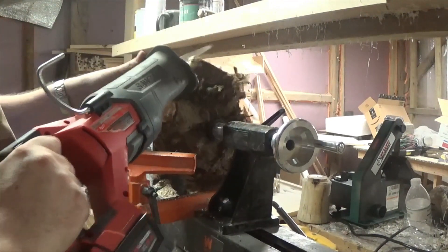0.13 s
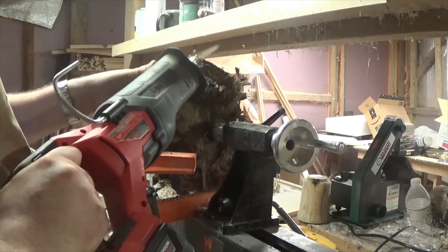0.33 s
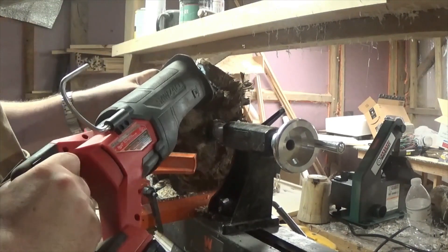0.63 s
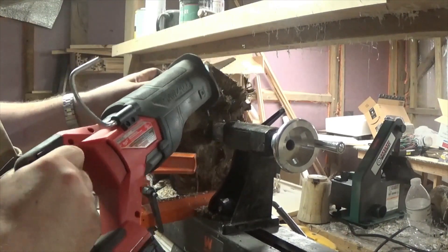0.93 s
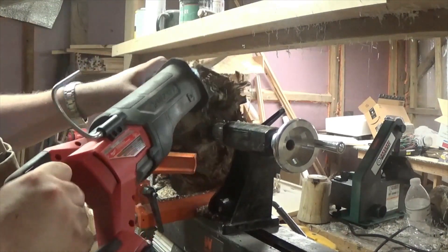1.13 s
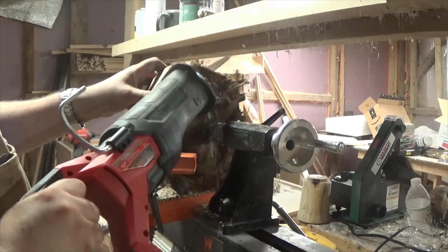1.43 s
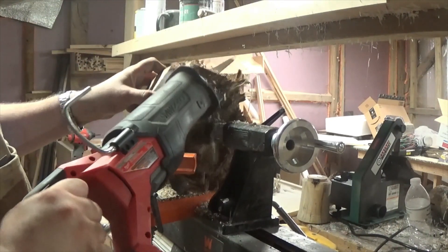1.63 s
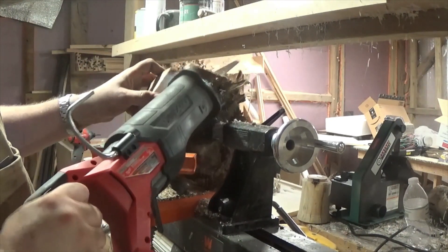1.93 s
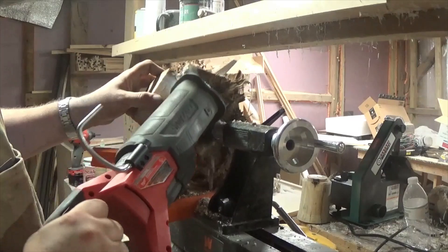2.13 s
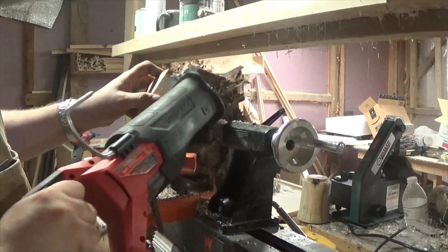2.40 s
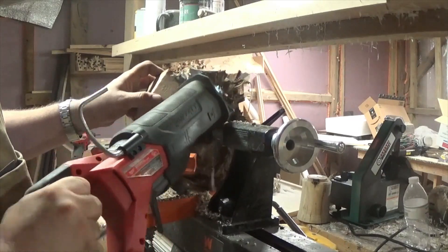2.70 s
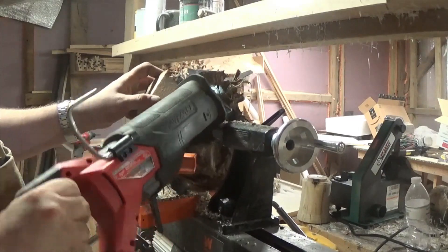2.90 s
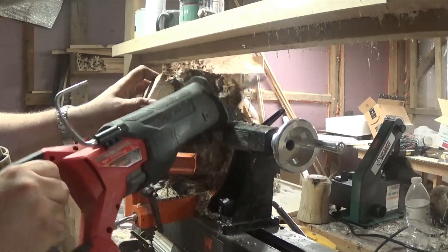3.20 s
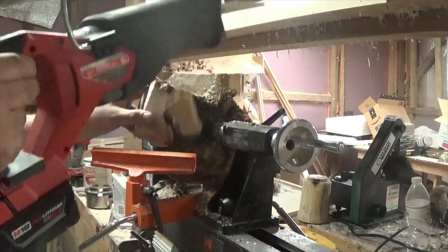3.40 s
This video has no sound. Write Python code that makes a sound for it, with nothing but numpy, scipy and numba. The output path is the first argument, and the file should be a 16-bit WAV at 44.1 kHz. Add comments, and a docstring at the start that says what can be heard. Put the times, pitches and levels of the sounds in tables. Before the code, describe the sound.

Close, bright reciprocating saw in a small shed, starting and stopping abruptly; dense hissing rasp over motor hum and gear whine, with brief squeals and groans, faint rings in the gaps, ending in tool clatter.

```python
"""A small saw cuts wet wood in short bursts, close to a camera in a shed.
Each burst starts sharply: dense random strikes excite blade and wood over drive hum and gear whine.
Squeals, groans, rasps and high whines, narrow noise bands, sound as it cuts; a small room's tail follows.
Between bursts come faint narrow-band rings and scrapes; one dull knock falls within the long burst.
At the end the tool scrapes, ticks and knocks as damped modes and noise; a faint hush lies beneath."""
import sys
import numpy as np
from scipy import signal
from scipy.fft import rfft, irfft
from scipy.io import wavfile
from scipy.ndimage import uniform_filter1d
from numba import njit

SR = 44100
rng = np.random.default_rng(int(sys.argv[2]) if len(sys.argv) > 2 else 0)


def generate_wav(signal):
    """Clip the signal to [-1, 1] and save it as 16-bit WAV at the path in sys.argv[1]."""
    frames = np.transpose(np.atleast_2d(signal))
    scaled = np.clip(frames, -1, 1) * 32767
    pcm = np.round(scaled).astype(np.int16)
    wavfile.write(sys.argv[1], SR, pcm)


N = 156555
T = np.arange(N) / SR  # s
FREQ = np.fft.rfftfreq(N, 1 / SR) + 1  # Hz, offset by 1 so that its logarithm exists

# Cutting bursts: start t/s, stop t/s, attack t/s
BURSTS = [(0.014, 0.587, 0.0012), (0.845, 0.963, 0.0063), (1.104, 2.646, 0.0089), (2.69, 2.758, 0.0067),
          (2.762, 2.839, .003), (2.984, 3.267, 0.0031)]
# Decay time of each band after a burst: T60/s
RELEASE_T60_S = [.1, .12, .11, .075, .06, .055]
# Band levels while cutting, one run of rows through all the bursts, in order of time: t/s, then
# level/dB of rumble, low wood, high wood, low treble, middle treble, top treble
BAND_LEVELS = [
    [(0.03, -65, -57, -62, -35.5, -34.5, -21), (0.06, -77, -44, -58, -36.5, -34, -31),
     (0.096, -60.5, -39, -45, -35, -34, -30), (0.144, -54, -57, -49.5, -34, -38, -29),
     (0.284, -81, -48, -44, -35.5, -30.5, -26), (0.312, -73, -46.5, -40.5, -33.5, -33, -29),
     (0.58, -60, -47.5, -50, -34, -34, -28.5)],
    [(0.86, -76, -50.5, -52.5, -36, -29.5, -34.5), (0.904, -57, -43, -54, -33.5, -40, -27),
     (0.932, -63, -50, -45, -32, -32, -22.5), (0.95, -54, -35, -33.5, -35, -46, -34)],
    [(1.125, -62, -48, -49, -36, -32.5, -23.5), (1.153, -67, -44, -50, -33, -33, -30),
     (1.185, -84, -53.5, -65, -33.5, -30, -32), (1.337, -58, -50, -52, -32.5, -36.5, -27),
     (1.355, -53, -42.5, -58, -34, -31, -29), (1.437, -74, -47.5, -45, -33.5, -31.5, -30),
     (1.9, -67.5, -49.5, -43, -34, -32, -31)],
    [(1.92, -76, -47, -43, -33.5, -33.5, -28.5), (2.118, -73, -54.5, -54, -32, -35, -28),
     (2.154, -97, -49, -54, -33.5, -32, -28.5), (2.288, -63, -52.5, -49, -33.5, -34.5, -28),
     (2.324, -94, -47, -54, -33, -35, -29), (2.342, -72, -54.5, -49, -32, -32, -29.5),
     (2.64, -61, -45, -40.5, -33.5, -33, -29.5)],
    [(2.705, -71, -61, -53, -39.5, -28, -30), (2.731, -65, -51, -36, -36.5, -30, -30),
     (2.749, -56, -38.5, -41.5, -30.5, -41, -23), (2.761, -71, -40, -39, -37, -45, -38),
     (2.775, -78, -56, -51, -35.5, -27, -32), (2.823, -57, -49, -58, -32, -37, -22),
     (2.835, -60, -39.5, -41.5, -36, -49, -31)],
    [(3.0, -82, -75, -77, -36, -32, -25.5), (3.026, -56, -45, -46, -31.5, -34, -26.5),
     (3.134, -69, -58, -50, -34.5, -30.5, -31), (3.19, -65, -71, -45.5, -30, -35, -27),
     (3.214, -70, -71, -87, -33.5, -30.5, -31), (3.238, -85, -73, -67, -33, -32, -31),
     (3.265, -60, -45.5, -59, -33.5, -35, -26.5)],
]
# Borders between those six bands: f/Hz
BAND_EDGES_HZ = [150, 900, 1700, 5000, 9500]
# Random level spread of each band: level/dB
CHATTER_DB = [3, 2.5, 2.8, 1.7, 1.1, 1.1]
CHATTER_PER_S = 90
# Relative spectrum of the strike noise: f/Hz, level/dB per Hz
HISS_SPECTRUM = [(24, -104), (40, -43), (296, -18.5), (500, -7.5), (539, -7), (643, -10.5), (1200, -13),
                 (1620, -10), (3800, -5.5), (6750, 1), (15800, 12)]
# Resonances of the wood: f/Hz, width/Hz, relative level/dB
WOOD_MODES = [(891, 43, 2), (1217, 53, 14), (1370, 60, 5.5), (1960, 27, 2)]
# Resonances of the blade: f/Hz, width/Hz, relative level/dB
BLADE_MODES = [(6810, 760, 4), (8060, 100, 8), (8660, 490, 7.5), (9180, 130, -2), (10550, 67, 11.5),
               (13940, 1450, 11), (15640, 670, 13.5)]
STRIKE_SCATTER_DB, WOOD_BLADE_SPLIT_HZ = 0.84, 2800
WOOD_DB, BLADE_DB = -12.5, -13  # resonances relative to the hiss on their side of the split
MODE_WANDER_DB, MODE_DRIFT = 2, .01  # drift as a fraction of the frequency

# Blade squeals, wood groans and rasps, and high drive whines near 14 kHz:
# start t/s, length t/s, from f/Hz, to f/Hz, width/Hz, level/dB
SQUEALS = [(0.01, 0.28, 10830, 10500, 250, -33), (0.035, 0.037, 9340, 8100, 250, -31),
           (.195, 0.037, 7080, 8300, 250, -32), (0.866, 0.041, 9720, 11530, 250, -27),
           (0.029, 0.037, 650, 604, 150, -42.5), (0.031, .04, 850, 825, 80, -44),
           (0.07, 0.042, 834, 790, 60, -36), (0.085, .035, 1070, 1040, 50, -39),
           (0.102, 0.044, 720, 580, 60, -43), (0.178, 0.036, 573, 570, 80, -39),
           (1.7, .26, 1233, 1225, 50, -41), (2.547, 0.066, 1190, 1174, 50, -40.5),
           (3.144, 0.057, 1200, 1195, 60, -43.5), (.25, 0.29, 14200, 14200, 100.7, -40),
           (0.257, 0.35, 8900, 8800, 250, -37.5), (3.05, 0.054, 13900, 14200, 40, -38),
           (3.09, .095, 14200, 13900, 40, -40), (3.175, 0.061, 14080, 14650, 40, -43),
           (3.09, 0.1, 15250, 15100, 50, -37)]
# Faint rings between and after bursts: start t/s, length t/s, f/Hz, level/dB, T60/s
RINGS = [(.605, .2, 5206, -68, .6), (.98, .125, 5230, -66, 3), (2.86, .09, 5200, -67, 3),
         (2.875, .055, 780, -56, 3), (3.3, .12, 5200, -72, 3)]
FLUTTER_DB, RING_WIDTH_HZ = 2.5, 30

# Blade speed and load: t/s, rate/strokes per s, bite/0-1
SPEED = [(0, 62.2, .3), (.22, 62.2, .4), (.27, 62.2, 1), (.59, 62.2, .9), (.85, 62.2, .5), (.96, 62.2, .5),
         (1.15, 61.7, 0), (1.4, 60.3, 0), (1.7, 59.4, 0), (2.0, 60, 0), (2.15, 60.8, 0), (2.4, 61.4, 0),
         (2.64, 62.5, 0), (2.7, 63, .5), (2.84, 63.5, .2), (3.0, 64, .2), (3.18, 64.4, .1),
         (3.26, 66.4, .1)]
# Drive hum: multiple of the stroke rate, level/dB running light, level/dB biting (before wander)
DRIVE_HARMONICS = [(3, -68, -72), (4, -71, -73), (5, -61, -67), (6, -59, -65), (8, -64, -60), (9, -50, -62),
                   (11, -62, -47), (12, -60, -62), (13, -63, -48), (14, -65, -50), (17, -65, -48),
                   (18, -59, -65), (19, -65, -51), (20, -57, -65), (24, -60, -60), (25, -65, -52),
                   (30, -60, -65)]
DRIVE_WANDER_DB, SPEED_WAVER = 4.5, .002  # waver as a fraction of the rate
GEAR_MULTIPLE, GEAR_DB, GEAR_BITE_DB, GEAR_JITTER = 67.3, -44.5, -8, .0055

# Scrapes: start t/s, length t/s, level/dB of the bright noise, body level/dB relative to it
SCRAPES = [(0.99, 0.12, -64, 0), (2.9, 0.11, -59, -5.5), (2.954, 0.053, -45.5, -9), (3.33, 0.034, -64, 5),
           (3.36, 0.095, -65, -4)]
# Ticks: t/s, nominal peak level/dB
TICKS = [(2.916, -55), (2.936, -49), (3.407, -50), (3.417, -28.5), (3.435, -46)]
# Knocks: t/s, peak level/dB of the modes, dullness/0-1, centre f/Hz
KNOCKS = [(1.335, -37, .95, 240), (3.4662, -21, .12, 1300), (3.543, -45, 1.0, 680)]
# Modes of the tool: f/Hz, relative level/dB, T60/s
TOOL_MODES = [(190, -24, .1), (320, -22, .08), (592, -8, .06), (720, -14, .05), (883, -10, .06),
              (1034, -12, .06), (1250, 0, .04), (1389, -2, .06), (1453, -3, .065), (1707, -10, .06),
              (1950, -9, .05), (2396, -15, .06), (2900, -15, .05), (3600, -13, .05), (4500, -14, .035)]
TICK_T60_S, BRIGHT_CORNER_HZ, SCRAPE_FLUTTER_DB = 0.0081, 2560, 3
KNOCK_RISE_S, KNOCK_ROUGH_DB, DULL_DB_PER_OCTAVE = .003, 3.5, 24
CRACK_DB, CRACK_DULL_DB, CRACK_T60_S = -9, -30, 0.065

# Reverberation of the room: band centre f/Hz, T60/s
ROOM_DECAY = [(300, 0.16), (1300, 0.2), (4000, 0.1), (12000, 0.05)]
ROOM_DB = -14
# Relative spectrum of the hush: f/Hz, level/dB per Hz
HUSH_SPECTRUM = [(18, -47), (30, -17), (316, -1), (534, -11), (1050, -11), (1270, -8), (2080, -13),
                 (13700, -16), (15600, -18)]
HUSH_DB, HUSH_SIDE_DB = -72, -9
BUZZ_HZ, BUZZ_DB, MAINS_PULSES_HZ = 13960, -85, 120
# Stereo width: f/Hz, side level/dB relative to mid
SIDE_SPECTRUM = [(60, -17), (125, -26), (400, -25), (800, -19), (1500, -11.5), (4000, -10.5), (8000, -10),
                 (14000, -13.5)]
LEFT_OVER_RIGHT_DB = .4
CEILING, TOP_HZ = 0.6, 15720  # soft limit of amplitude, edge of the low-pass


def undb(db):
    """Amplitude ratio is ten to the power dB/20."""
    return 10 ** (np.asarray(db) / 20)


def unit(x):
    """Normalisation to a root mean square of one."""
    return x / np.sqrt(np.mean(x ** 2))


def on_hz(table):
    """Interpolation of (f/Hz, value) rows along a logarithmic frequency axis."""
    table = np.array(table)
    return np.interp(np.log(FREQ), np.log(table[:, 0]), table[:, 1])


def shape(x, gain):
    """Linear filtering as multiplication of the spectrum."""
    return irfft(rfft(x) * gain, N)


@njit
def svf(x, hz, width):
    """State-variable resonator: a band-pass of unit peak gain whose centre may move."""
    y, band, low = np.empty(len(x)), 0., 0.
    for i in range(len(x)):
        g = np.tan(np.pi * hz[i] / SR)
        damping = width / hz[i]
        v = (band + g * (x[i] - low)) / (1 + g * (g + damping))
        band, low = 2 * v - band, low + 2 * g * v
        y[i] = damping * v
    return y


def band_noise(hz, width):
    """White noise through a resonator of fixed centre, at unit level."""
    return unit(svf(rng.standard_normal(N), np.full(N, 1. * hz), 1. * width))


def walk(rate):
    """Slow random modulation: smoothed random steps at the given rate in Hz, spread one."""
    k = int(SR / rate)
    steps = np.repeat(rng.standard_normal(N // k + 1), k)
    smooth = uniform_filter1d(uniform_filter1d(steps, k), k)
    return unit(smooth[:N])


def fade(start, t60):
    """Exponential decay, 60 dB in the time t60."""
    return (T >= start) * undb(-60 * np.maximum(T - start, 0) / t60)


def swell(start, length):
    """Trapezoidal envelope: a linear rise, a hold and a linear fall."""
    u = (T - start) / length
    return np.clip(np.minimum(u, 1 - u) * 6, 0, 1)


def gate(t60):
    """Burst envelope: quadratic attack, hold and exponential release as the trigger goes on and off."""
    envelopes = []
    for start, stop, attack in BURSTS:
        rise = np.clip((T - start) / attack, 0, 1) ** 2
        envelopes.append(rise * undb(-60 * np.maximum(T - stop, 0) / t60))
    return np.max(envelopes, axis=0)


def resonances(x, table):
    """Forced modes in parallel, each drifting in frequency and level independently."""
    total = 0
    for hz, width, db in table:
        gain = undb(db + MODE_WANDER_DB * walk(9.64))
        centre = hz * (1 + MODE_DRIFT * walk(9.7))
        total = total + gain * svf(x, centre, 1. * width)
    return unit(total)


def saw():
    """Random tooth strikes excite wood and blade modes; six bands then follow their own levels."""
    scatter = undb(STRIKE_SCATTER_DB * rng.exponential(size=N))
    strikes = unit(rng.standard_normal(N) * scatter)
    hiss = unit(shape(strikes, undb(on_hz(HISS_SPECTRUM))))
    is_wood = FREQ < WOOD_BLADE_SPLIT_HZ
    wood_gain = undb(WOOD_DB) * np.std(shape(hiss, is_wood))
    blade_gain = undb(BLADE_DB) * np.std(shape(hiss, ~is_wood))
    wood = wood_gain * resonances(strikes, WOOD_MODES)
    blade = blade_gain * resonances(strikes, BLADE_MODES)
    cut = hiss + wood + blade

    rows = np.vstack(BAND_LEVELS)
    edges = [0] + BAND_EDGES_HZ + [SR]
    out = 0
    for k in range(len(edges) - 1):
        # the difference of two low-pass power responses is a band
        below_top = 1 / (1 + (FREQ / edges[k + 1]) ** 8)
        below_bottom = 1 / (1 + (FREQ / (edges[k] + 1)) ** 8)
        band = unit(shape(cut, np.sqrt(np.abs(below_top - below_bottom))))
        db = np.interp(T, rows[:, 0], rows[:, k + 1]) + CHATTER_DB[k] * walk(CHATTER_PER_S)
        out = out + band * undb(db) * gate(RELEASE_T60_S[k])
    return out


def squeals():
    """Narrow-band resonance of noise: squeals, groans, rasps and whines, and rings of fixed pitch."""
    out = 0
    for start, length, hz_from, hz_to, width, db in SQUEALS:
        hz = np.interp(T, [start, start + length], [hz_from, hz_to])
        tone = unit(svf(rng.standard_normal(N), hz, 1. * width))
        out = out + undb(db + FLUTTER_DB * walk(50)) * swell(start, length) * tone
    for start, length, hz, db, t60 in RINGS:
        envelope = swell(start, length) * fade(start, t60)
        out = out + undb(db) * envelope * band_noise(hz, RING_WIDTH_HZ)
    return out


def drive():
    """Periodic forcing: hum on multiples of the stroke rate, and a gear whine tied to that rate."""
    times, speed, load = np.array(SPEED).T
    rate = np.interp(T, times, speed) * (1 + SPEED_WAVER * walk(12))
    bite = np.interp(T, times, load)
    turn = 2 * np.pi * np.cumsum(rate) / SR  # phase in radians
    hum = 0
    for multiple, light_db, biting_db in DRIVE_HARMONICS:
        db = light_db + bite * (biting_db - light_db) - DRIVE_WANDER_DB * np.abs(walk(9))
        hum = hum + undb(db) * 2 * np.sin(multiple * turn + 2 * np.pi * rng.random())
    jitter = 2 * np.pi * np.cumsum(GEAR_JITTER * rate * walk(60)) / SR
    whine = np.sqrt(2) * np.sin(GEAR_MULTIPLE * (turn + jitter))
    whine_db = GEAR_DB + GEAR_BITE_DB * bite + FLUTTER_DB * walk(20)
    # heard() gates hum and whine together, so the whine is gated twice
    return hum + undb(whine_db) * gate(RELEASE_T60_S[2]) * whine


def knock(start, db, dull, centre_hz, crack_noise):
    """Impulse response of the tool: damped modes with a crack; dullness favours modes near the centre."""
    ring = 0
    for k, (hz, mode_db, t60) in enumerate(TOOL_MODES):
        loss_db = DULL_DB_PER_OCTAVE * dull * np.abs(np.log2(hz / centre_hz))
        gain = undb(mode_db - loss_db + KNOCK_ROUGH_DB * walk(150))
        sine = (-1) ** k * np.sin(2 * np.pi * hz * (T - start))
        ring = ring + gain * fade(start, t60) * sine
    ring = ring * np.clip((T - start) / KNOCK_RISE_S, 0, 1)
    crack = undb(CRACK_DB + CRACK_DULL_DB * dull) * fade(start, CRACK_T60_S) * crack_noise
    return undb(db) * (ring / np.abs(ring).max() + crack)


def handling():
    """Friction and impact: scrapes of held noise, ticks of decaying noise, and knocks of the tool."""
    noise = rng.standard_normal(N)
    bright = unit(shape(noise, 1 / np.sqrt(1 + (BRIGHT_CORNER_HZ / FREQ) ** 4)))
    body = unit(svf(noise, np.full(N, 1280.), 410.0))
    out = 0
    for start, length, db, body_db in SCRAPES:
        gain = undb(db + SCRAPE_FLUTTER_DB * walk(60)) * swell(start, length)
        out = out + gain * (bright + undb(body_db) * body)
    for start, db in TICKS:
        out = out + undb(db) / 2 * fade(start, TICK_T60_S) * bright
    for start, db, dull, centre_hz in KNOCKS:
        out = out + knock(start, db, dull, centre_hz, bright + 1.05 * body)
    return out


def room(x):
    """Reverberation as convolution with decaying noise, whose T60 depends on the band."""
    tail = 0
    for hz, t60 in ROOM_DECAY:
        tail = tail + band_noise(hz, 1.24 * hz) * np.sqrt(hz) * fade(0.002, t60)
    tail = tail[:SR // 2]
    return signal.fftconvolve(x, tail / np.sqrt(np.sum(tail ** 2)))[:N]


def floor():
    """Stationary noise and pulse excitation: room hush and a faint high buzz at a mains rate."""
    noise = unit(shape(rng.standard_normal(N), undb(on_hz(HUSH_SPECTRUM))))
    hush = noise * undb(HUSH_DB + 0.5 * walk(6.6))
    pulses = 1. * (np.diff(np.floor(T * MAINS_PULSES_HZ), prepend=0) > 0)
    buzz = unit(svf(pulses, np.full(N, 1. * BUZZ_HZ), 700.))
    return hush + undb(BUZZ_DB) * buzz


def heard(hum):
    """Superposition of direct sound, its reverberation and the gated hum, with fresh random draws."""
    direct = saw() + squeals() + handling()
    return direct + undb(ROOM_DB) * room(direct) + hum * gate(RELEASE_T60_S[2])


def scene():
    """Mid-side stereo: an independent side signal makes left and right differ."""
    mid = heard(drive()) + floor()
    side = shape(heard(0), undb(on_hz(SIDE_SPECTRUM))) + undb(HUSH_SIDE_DB) * floor()
    left = (mid + side) * undb(LEFT_OVER_RIGHT_DB / 2)
    right = (mid - side) * undb(-LEFT_OVER_RIGHT_DB / 2)
    return np.array([left, right])


def record(dry):
    """Saturation and band limiting: the camera rounds peaks, drops deep bass and cuts the top."""
    rounded = CEILING * np.tanh(dry / CEILING)
    high_pass = signal.butter(2, 50, "high", fs=SR, output="sos")
    low_pass = signal.ellip(12, .2, 80, TOP_HZ, fs=SR, output="sos")
    return signal.sosfilt(low_pass, signal.sosfilt(high_pass, rounded))


dry = scene()
out = record(dry)
generate_wav(out)
```